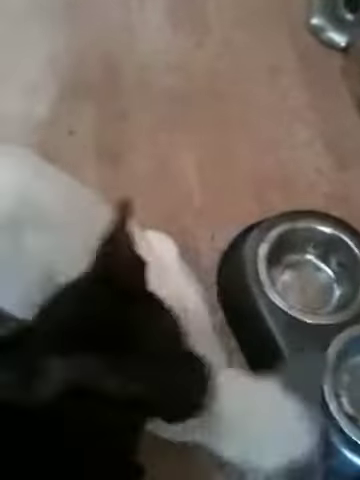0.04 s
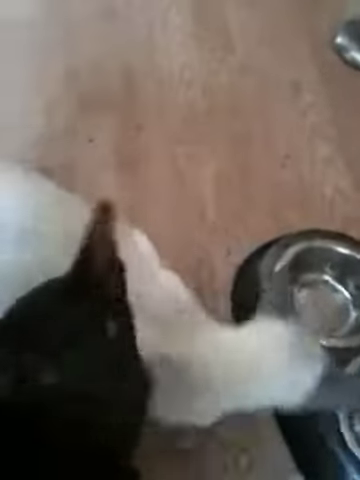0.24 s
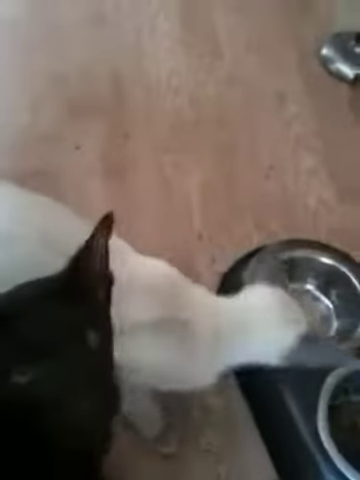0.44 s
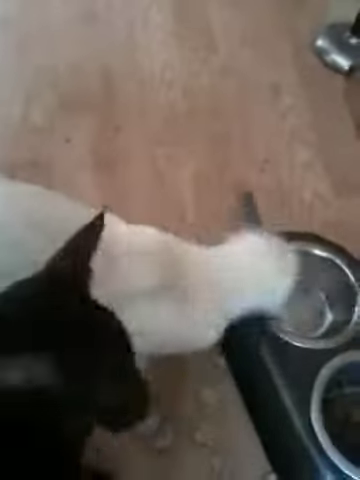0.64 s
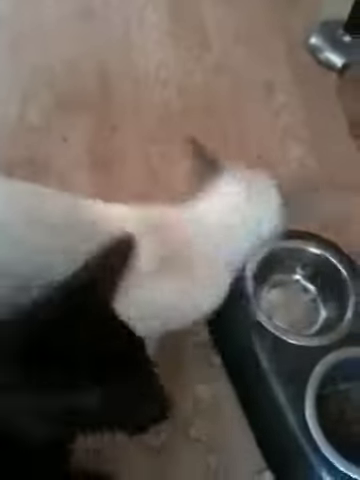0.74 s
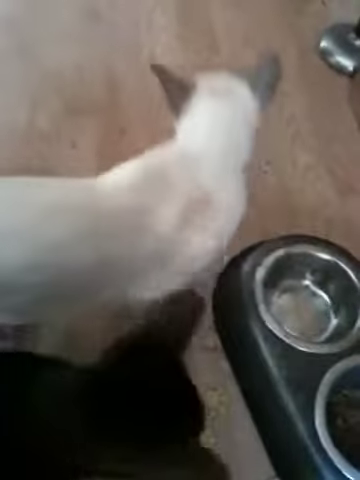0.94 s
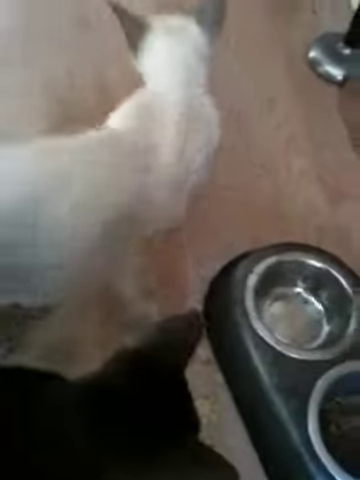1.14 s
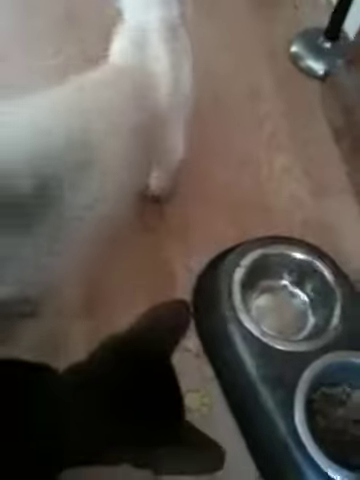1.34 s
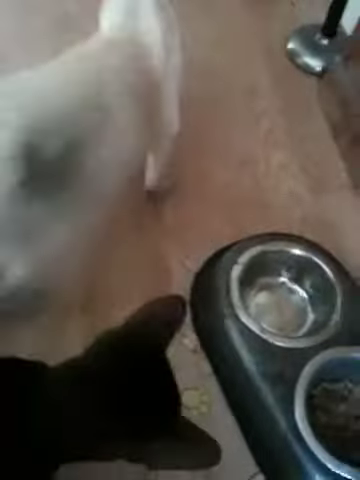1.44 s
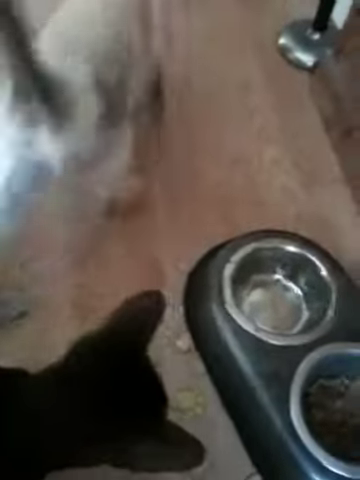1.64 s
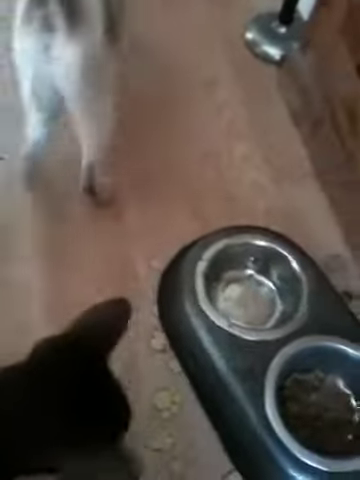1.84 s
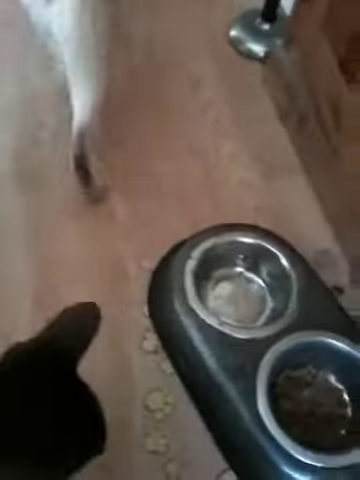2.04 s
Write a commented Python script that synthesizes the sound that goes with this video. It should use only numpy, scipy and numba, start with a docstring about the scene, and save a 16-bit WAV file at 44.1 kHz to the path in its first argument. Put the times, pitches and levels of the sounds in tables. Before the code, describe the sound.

Dry biscuits pour into a steel bowl, clattering and ringing brightly, then settle to faint crumbs.

```python
"""A quiet kitchen: dry biscuits rustle out of a bag and are poured into a steel bowl near a phone.
Each piece rings the bowl's modes, and the rings shorten as the bowl fills; shaped noise adds dense clatter.
Noise bursts make the pieces click on each other, and many tiny ones make the rustle down to the last crumbs.
A small metal thing clinks, soft knocks come from the stand, and faint tones glide.
A dull room tail follows, and steady coloured noise is the hush of the room."""
import sys
import numpy as np
from scipy import signal
from scipy.fft import rfft, irfft
from scipy.io import wavfile
from scipy.ndimage import uniform_filter1d
from numba import njit

SR = 44100
rng = np.random.default_rng(int(sys.argv[2]) if len(sys.argv) > 2 else 0)


def bounce(signal):
    """Save signal as a 16-bit WAV file at the path given by the first command-line argument."""
    frames = np.transpose(np.atleast_2d(signal))
    limited = np.clip(frames, -1, 1)
    pcm = np.round(limited * 32767).astype(np.int16)
    wavfile.write(sys.argv[1], SR, pcm)


def amplitude_ratio(level_db):
    """Convert a level in decibels to the matching linear amplitude (field) ratio."""
    exponent = np.asarray(level_db, float) / 20
    return 10 ** exponent


N = 92610


def curve(table, col):
    """Draw straight lines between one column's values, over time."""
    table = np.array(table, float)
    return np.interp(np.arange(N) / SR, table[:, 0], table[:, col])


def colour(x, table):
    """Shape a sound by (Hz, dB) points, keeping its average strength (rms)."""
    table = np.array(table, float)
    hz = np.maximum(np.arange(N // 2 + 1) * SR / N, 1)
    gain = amplitude_ratio(np.interp(np.log(hz), np.log(table[:, 0]), table[:, 1]))
    y = irfft(rfft(x) * gain, N)
    return y * np.sqrt(np.mean(x ** 2) / np.mean(y ** 2))


def high_pass(x, order, hz):
    """Weaken everything below a frequency."""
    return signal.sosfilt(signal.butter(order, hz, "high", fs=SR, output="sos"), x)


def fade(x, t60):
    """Give every impulse a tail that shrinks to a thousandth in t60 seconds (2 ms at least)."""
    return signal.lfilter([1], [1, -np.exp(-np.log(1000) / (max(t60, .002) * SR))], x)


def envelope(power, t60):
    """Turn impulses of power into loudness that dies 60 dB in t60 seconds."""
    return np.sqrt(fade(power, t60 / 2))  # the root halves the speed of the fade


def spikes(times, sizes):
    """Place impulses at given seconds."""
    return np.bincount(np.clip((np.asarray(times) * SR).astype(int), 0, N - 1), sizes, N)


@njit
def ring(x, hz, loss):
    """One mode swings at its pitch and loses a share of its size per sample; both may change."""
    y, z = np.empty(len(x)), 0j
    for i in range(len(x)):
        if i % 32 == 0:
            turn = np.exp(2j * np.pi * hz[i] / SR) * (1 - loss[i])
        z = z * turn + x[i]
        y[i] = z.imag
    return y


def hush():
    """The quiet room is steady noise, strongest in the bass and low middle."""
    # Each row: frequency in Hz, level in dB.
    hush_colour = [(15, -49.5), (25, -14.5), (58, -6), (87, -14), (162, -2.5), (376, -8.5), (536, -14),
                   (7430, -21), (16300, -29.5)]
    return amplitude_ratio(-70) * colour(rng.standard_normal(N), hush_colour)


def room(x):
    """Many mixed echoes form a dull tail: fading noise, begun 4 ms late, is spread over the sound."""
    room_db, t60_s, top_hz = -15.5, .35, 5980
    n = np.arange(SR // 2)
    tail = rng.standard_normal(len(n)) * np.exp(-n * np.log(1000) / (t60_s * SR)) * (n > .004 * SR)
    tail = signal.lfilter(*signal.butter(1, top_hz, fs=SR), tail)
    tail = tail / np.sqrt(np.sum(tail ** 2))
    return amplitude_ratio(room_db) * signal.fftconvolve(x, tail)[:N]


def squeak():
    """Faint, slightly rough sine tones glide: squeaks fall in pitch, low burbles rise."""
    # Each row: start in seconds, end in seconds, level in dB, first pitch in Hz, last pitch in Hz.
    glides = [(1.485, 1.545, -69.5, 3080, 2650), (1.52, 1.56, -72, 4950, 4450),
              (1.945, 1.985, -66, 240, 410), (2.03, 2.065, -67, 170, 270)]
    out = 0
    for start, end, db, hz0, hz1 in glides:
        along = np.clip((np.arange(N) / SR - start) / (end - start), 0, 1)
        swell = np.sqrt(np.abs(np.sin(np.pi * along)))
        rough = uniform_filter1d(rng.standard_normal(N), size=500)
        tone = np.sin(2 * np.pi * np.cumsum(hz0 + (hz1 - hz0) * along) / SR)
        out = out + amplitude_ratio(db) * swell * (1 + .45 * rough / rough.std()) * tone
    return out


def thuds():
    """A soft knock sets the plastic stand into a low, quickly dying swing."""
    # Each row: time in seconds, level in dB, pitch in Hz.
    knocks = [(0.639, -35, 383), (0.984, -22, 293), (1.294, -43.5, 350)]
    t60_s = 0.021
    loss = np.full(N, np.log(1000) / (t60_s * SR))
    low = 0
    for s, db, hz in knocks:
        blow = spikes([s], [amplitude_ratio(db)]) + 1e-18  # the tiny offset avoids slow arithmetic near zero
        low = low + ring(blow, np.full(N, hz * 1.), loss)
    return uniform_filter1d(low, size=30)  # softens the start


def clink():
    """One blow rings a small metal thing; each bright mode is a close cluster of three."""
    # Each row: pitch in Hz, level in dB, time to die 60 dB in seconds.
    clink_modes = [(7180, -4, 0.16), (7900, -2.5, 0.13), (8200, -13, 0.11), (8840, -8, 0.068),
                   (9500, -7.5, 0.14), (10200, -5, 0.11), (10900, -10, 0.12), (6300, -4, 0.043),
                   (12170, -1, 0.065), (13100, -15, 0.11)]
    clink_s, clink_db = 1.3453, -46.5
    blow = spikes([clink_s], [amplitude_ratio(clink_db)]) + 1e-18
    shifts = rng.uniform(-1, 1, (len(clink_modes), 3)) * [0, 1, 1]  # the first keeps its pitch
    out = 0
    for (hz, db, t60), row in zip(clink_modes, shifts):
        loss = np.full(N, np.log(1000) / (t60 * SR))
        for shift in row:
            mode = ring(blow, np.full(N, hz * (1 + .025 * shift)), loss)
            out = out + amplitude_ratio(db - 6 * (shift != 0)) * mode  # neighbours are 6 dB weaker
    return out


def stream(col):
    """Random small pieces: their times, and sizes that follow a column with random extra dB."""
    # Each row: time in seconds, level on the steel in dB, level of the dry rustle in dB.
    flow = [(0, -99, -53), (.1, -94, -50), (.205, -107, -59), (.225, -48, -40.5), (.3, -25, -42.5),
            (.38, -33.5, -43), (.5, -33, -43.5), (.6, -42, -44.5), (.68, -26.5, -47.5), (.73, -40, -45.5),
            (.9, -36.5, -53), (1.0, -94, -52.5), (1.15, -62.5, -63), (1.3, -64, -68), (1.42, -61, -77),
            (1.54, -60.5, -94), (1.58, -86, -105.5), (1.9, -79, -86), (2.0, -73, -75.5), (2.1, -69, -82)]
    pieces_per_s, extra_db = 600, 2.5  # extra_db is the average extra
    draw = rng.random((int(pieces_per_s * N / SR), 2))
    t = draw[:, 0] * N / SR
    db = curve(flow, col)[(t * SR).astype(int)] - extra_db * np.log(1 - draw[:, 1])
    return t, amplitude_ratio(db)


def rustle():
    """Many tiny dry contacts each let off a short puff of coloured noise."""
    # Each row: frequency in Hz, level in dB.
    rustle_colour = [(59, -39.5), (100, -27), (308, -4.5), (558, -8.5), (836, -2.5), (1650, -6.5),
                     (4470, -5.5), (9610, -19), (16000, -52.5)]
    t, size = stream(col=2)
    return envelope(spikes(t, size ** 2), 0.014) * colour(rng.standard_normal(N), rustle_colour)


def clicks():
    """Pieces hit pieces, bag and floor: sharp noise bursts round their own pitches, with softer tails. The
    burst at 1.345 s is the noisy strike of the small metal clink."""
    # Each row: time in seconds, peak in dB, centre pitch in Hz, width to either side in octaves (.2 at least).
    contacts = [(0.005, -30, 4200, 0.68), (0.014, -29, 4200, 0.72), (0.027, -35, 4250, 0.98),
                (0.077, -29.5, 5240, 0.47), (0.085, -45, 4500, 0.57), (0.108, -36.5, 4350, 0.57),
                (0.132, -32.5, 4950, 0.59), (0.162, -30, 1420, 2.1), (0.182, -35, 4170, 0.72),
                (1.129, -40, 1290, 2.5), (1.174, -43, 2196, 1.6), (1.2, -34, 1945, 2.2),
                (1.242, -40, 5660, 0.56), (1.26, -44, 6040, 0.3), (1.288, -32.5, 4840, 0.34),
                (1.33, -38.5, 2968, 2.2), (1.345, -34, 7570, 0.28), (1.466, -56.5, 2260, 0.89),
                (1.479, -52.5, 4520, 0.78), (1.623, -56.5, 3900, 0.6), (1.624, -52.5, 570, 0.55),
                (1.638, -49, 4200, 0.6), (1.743, -62.5, 6870, 0.57), (1.804, -52, 3360, 1.3),
                (1.867, -55.5, 510, 0.3), (1.945, -56, 5300, 0.73), (1.979, -49.5, 6200, 0.37),
                (1.987, -48, 6170, 0.44), (1.999, -54.5, 3340, 0.37), (2.019, -50, 5620, .5)]
    t60_s, tail_db, tail_t60_s = 0.029, -19, 0.038
    broad_db = -19.5  # share of noise at every pitch
    out, t = np.zeros(N + 4096), np.arange(4096) / SR
    f = np.maximum(np.arange(2049) * SR / 4096, 1)
    tail = 1000. ** (-t / t60_s) + amplitude_ratio(tail_db) * 1000. ** (-t / tail_t60_s)
    for s, db, hz, octaves in contacts:
        away = np.log2(f / hz) / max(octaves, .2)
        gain = amplitude_ratio(broad_db) + 1 / (1 + away ** 4)
        burst = tail * irfft(rfft(rng.standard_normal(4096)) * gain)
        start = int(s * SR)
        out[start:start + 4096] += amplitude_ratio(db) * burst / np.abs(burst).max()
    return out[:N]


def heap(x):
    """The filled bowl and its stand answer dry contacts with broad, dull resonances."""
    # Each row: pitch in Hz, level in dB, width in Hz.
    resonances = [(850, 8, 120), (1290, 5, 180), (2500, 3, 400)]
    x = x * (np.arange(N) > .85 * SR)  # only once the heap has grown, in seconds
    out = 0
    for hz, db, width in resonances:
        out = out + amplitude_ratio(db) * signal.lfilter(*signal.iirpeak(hz, hz / width, SR), x)
    return out


TREBLE_HZ = 6300  # a strike's treble level acts above this


def clatter(t, size, high_db):
    """Countless blurred steel tones are noise: each blow gives a long wash and a short contact tick."""
    # Each row: frequency in Hz, level in dB.
    steel_colour = [(120, -73), (200, -34.5), (683, -12.5), (950, -11.5), (1060, -0.5), (1420, -14),
                    (3130, -10.5), (4520, -5), (4950, -0.5), (16000, -24)]
    wash_db, wash_t60_s, tick_db, tick_t60_s = -20, 0.054, -18, 0.02
    noise = colour(rng.standard_normal(N), steel_colour)
    out = 0
    for kind, gain in (("low", size), ("high", size * amplitude_ratio(high_db))):
        power = spikes(t, gain ** 2)
        shape = amplitude_ratio(wash_db) * envelope(power, wash_t60_s) + amplitude_ratio(tick_db) * envelope(power, tick_t60_s)
        band = signal.butter(2, TREBLE_HZ, kind, fs=SR, output="sos")
        out = out + signal.sosfilt(band, shape * noise)
    return out


def bowl():
    """Strikes and small pieces ring clusters of steel modes; the growing heap damps and detunes them."""
    # Each row: time in seconds, level in dB, extra level of low rings in dB, extra level of treble in dB.
    strikes = [(0.2188, -15, -33, 4), (0.2291, -5, 8, -8.5), (0.2548, -4.5, -5, 0), (0.2667, -5.5, 1.5, 5),
               (0.2864, -12, 2.5, 5), (0.3051, -5, -3, -2), (0.3184, -4, 3, -1), (0.3943, -8, -0.5, -7),
               (0.4079, -18, -5, 7), (0.453, -23, -5, 5.5), (0.4609, -17.5, -2, 9), (0.4686, -6, -2, -1.5),
               (0.5463, -20.5, 12.5, -1.5), (0.61, -9, -4, 0.5), (0.668, -16.5, -1, 2),
               (0.6868, -14, -1.5, -4), (0.6969, -22.5, 18.5, 7), (0.7389, -13, -5.5, 1),
               (0.7661, -14, -2.5, -2.5), (0.8143, -27, 3.5, 6), (0.8552, -22.5, -2.5, 4.5),
               (0.865, -16, -14.5, -4), (0.9434, -26.5, -4, -9), (0.9697, -13.5, 0, -3.5),
               (1.0506, -25, 1, 0.5), (1.0568, -53, 22.5, -15), (1.0919, -18.5, -4, -6)]
    # Each row: pitch in Hz, level in dB, time to die 60 dB in seconds when the bowl is empty.
    bowl_modes = [(685, -9, 0.21), (1084, -6, 0.42), (1285, -17.5, 0.25), (2416, -11.5, .08),
                  (1737, -17.5, 0.3), (2880, -13, 0.14), (3780, -2.5, 0.13), (4199, -7.5, 0.079),
                  (4685, -21.5, 0.6), (4522, 2, 0.11), (5460, -10.5, 0.17), (5622, 0, 0.2),
                  (5940, -7.5, 0.1), (6790, -7.5, 0.26), (7423, -1.5, 0.086), (8560, -9.5, 0.2),
                  (9130, -9.5, 0.21), (10900, -9, 0.05), (10950, -22.5, 0.39), (13140, -7.5, 0.064),
                  (14750, -31.5, .1)]
    ring_db, spot_db = -25, 5.5  # spot_db scatters a mode's strength with the spot struck
    handful_s, later_db = .006, -9  # a strike is three pieces within this time, the later two weaker
    fill_start_s, damping_per_s = .33, 4
    cluster, cluster_db = .042, -4.5  # a neighbour's farthest shift as a share of pitch, and its level
    wander, wander_per_s = .005, 30  # share of pitch in the empty bowl, random points per second

    hits = np.repeat(np.array(strikes, float), 3, axis=0)
    later = np.arange(len(hits)) % 3 > 0
    small_t, small = stream(col=1)
    t = np.r_[hits[:, 0] + handful_s * later * rng.random(len(hits)), small_t]
    size = np.r_[amplitude_ratio(hits[:, 1] + later_db * later), small]
    low_db, high_db = (np.r_[hits[:, k], 0 * small] for k in (2, 3))

    spot = rng.standard_normal((len(t), len(bowl_modes), 6))
    sign = rng.choice([-1, 1], spot.shape)
    shift = rng.uniform(-1, 1, (len(bowl_modes), 6))
    walk = rng.standard_normal((len(bowl_modes), 6, 200))
    now = np.arange(N) / SR
    damp = 1 + damping_per_s * np.maximum(now - fill_start_s, 0)
    out = 0
    for k, (hz, db, t60) in enumerate(bowl_modes):
        tone_db = low_db if hz < 2000 else high_db if hz > TREBLE_HZ else 0
        loss = np.log(1000) * damp / (t60 * SR)
        for j in range(6 if hz > 3000 else 4):  # the mode itself, then its five or three neighbours
            scatter_db = spot_db * (spot[:, k, j] + spot[:, k, 0]) / 2
            weaker_db = cluster_db * (j > 0) * (1 + (hz < 2000))  # twice the drop for low modes
            push = size * sign[:, k, j] * amplitude_ratio(ring_db + db + tone_db + scatter_db + weaker_db)
            drift = wander * damp * np.interp(now * wander_per_s, np.arange(200), walk[k, j])
            pitch = hz * (1 + cluster * shift[k, j] * (j > 0) + drift)
            out = out + ring(spikes(t, push) + 1e-18, pitch, loss)
    return high_pass(out + clatter(t, size, high_db), 4, 540)  # the bowl's sound is kept above 540 Hz


def scene():
    """Add up all sources and their room, thin the bass, then lay the hush under them."""
    dry_contacts = clicks() + rustle()
    near = bowl() + dry_contacts + heap(dry_contacts) + thuds() + clink() + squeak()
    near = high_pass(near + room(near), 3, 157)  # the microphone's low limit in Hz
    return (near + hush())[None]


def band_limit(x):
    """A steep low-pass at the top of the band."""
    return signal.sosfilt(signal.butter(12, 16470, fs=SR, output="sos"), x)


def record(dry):
    """The phone takes in the finished mix."""
    return band_limit(dry)


dry = scene()
out = record(dry)
bounce(out)
```